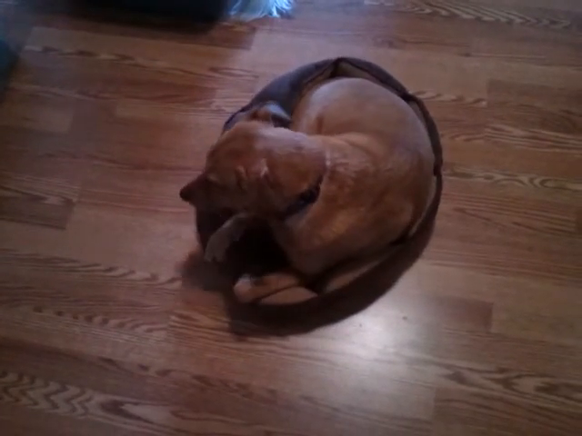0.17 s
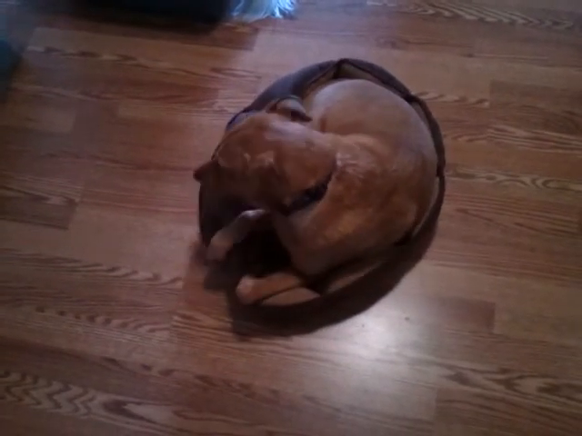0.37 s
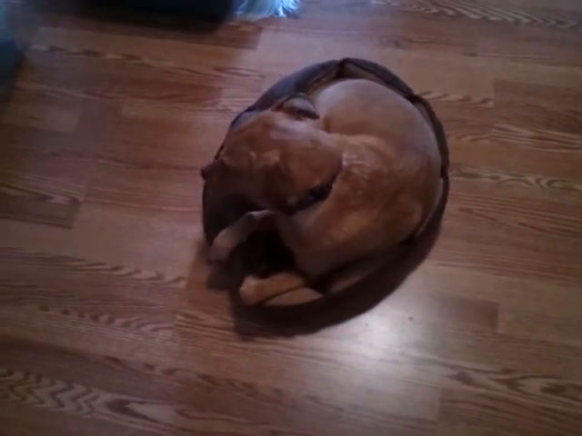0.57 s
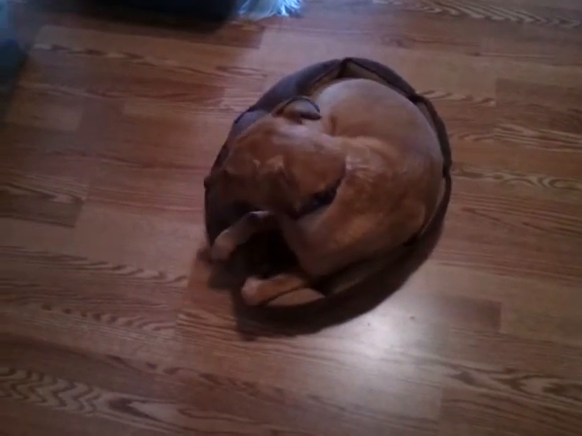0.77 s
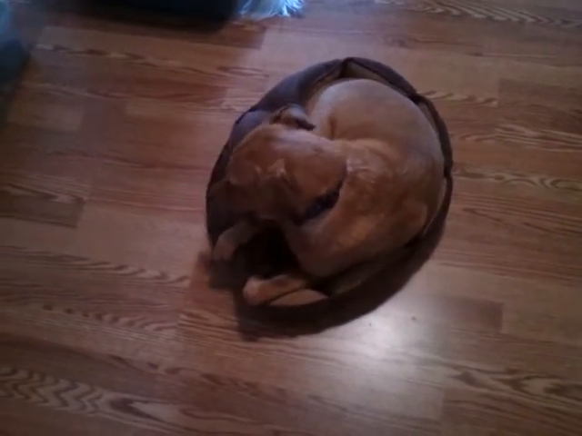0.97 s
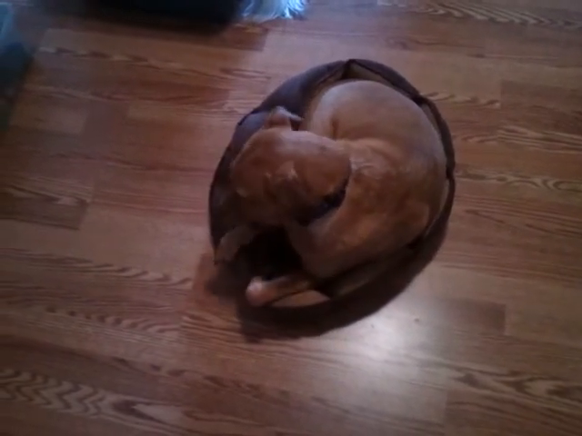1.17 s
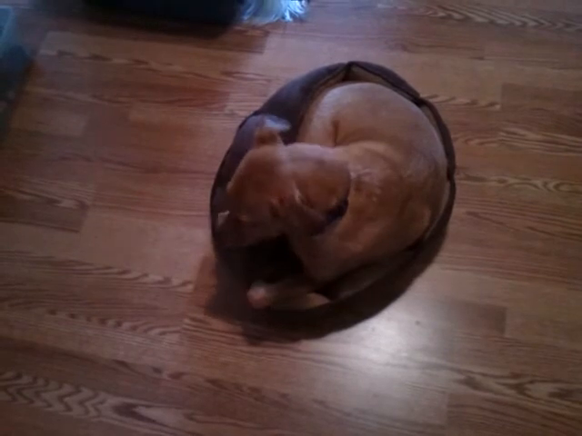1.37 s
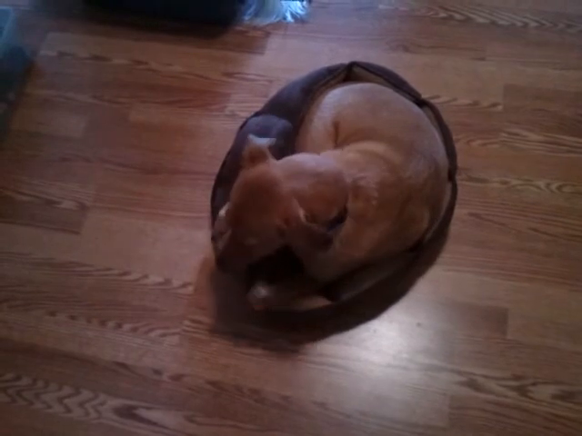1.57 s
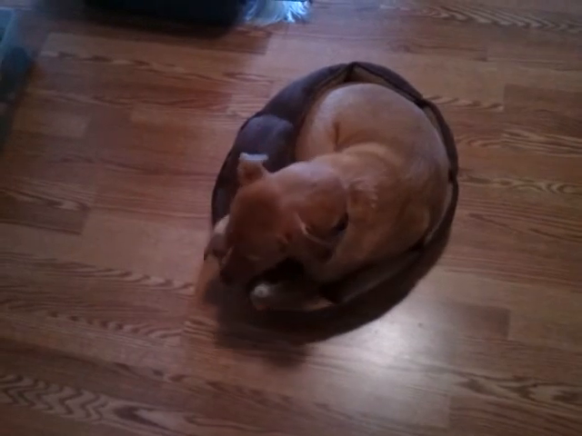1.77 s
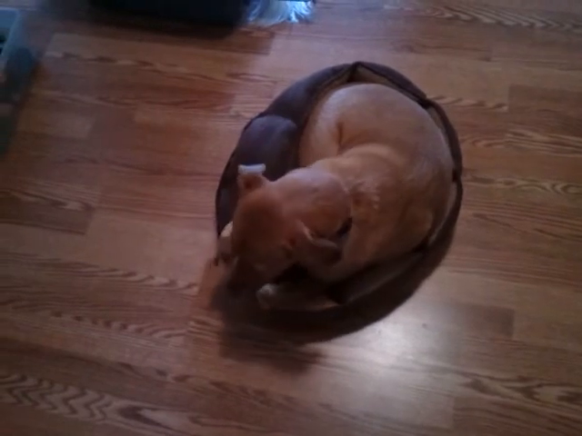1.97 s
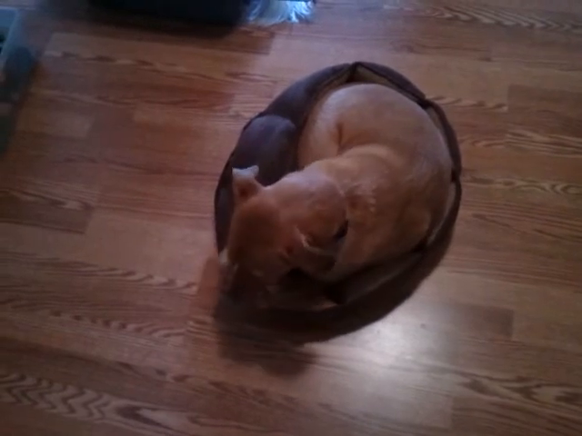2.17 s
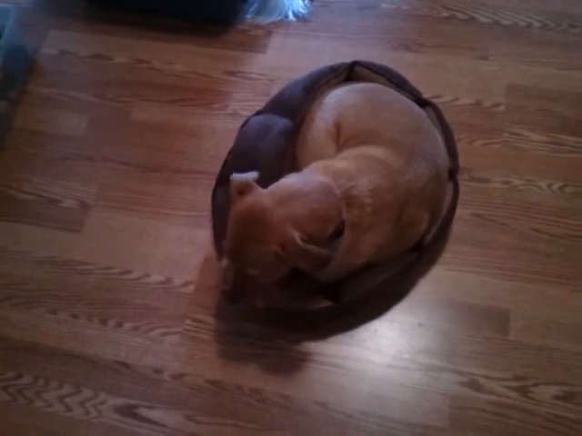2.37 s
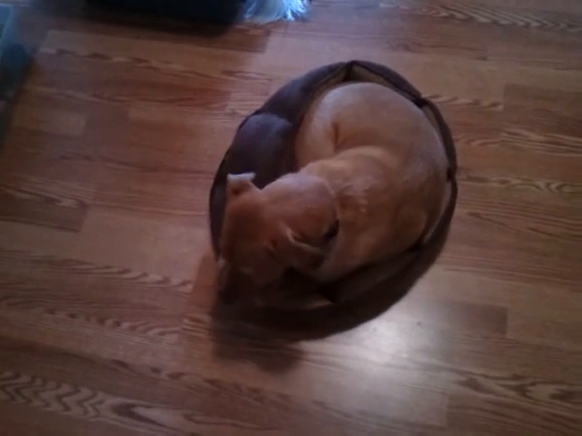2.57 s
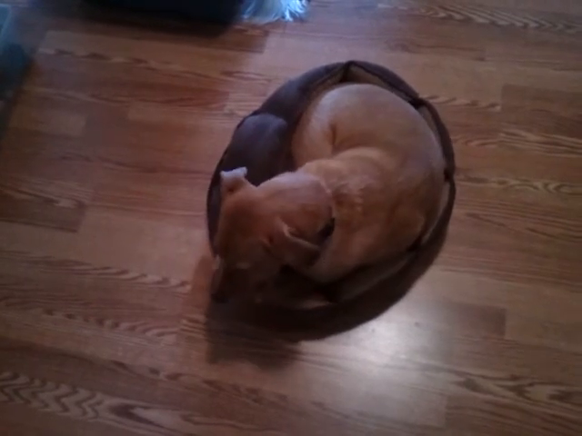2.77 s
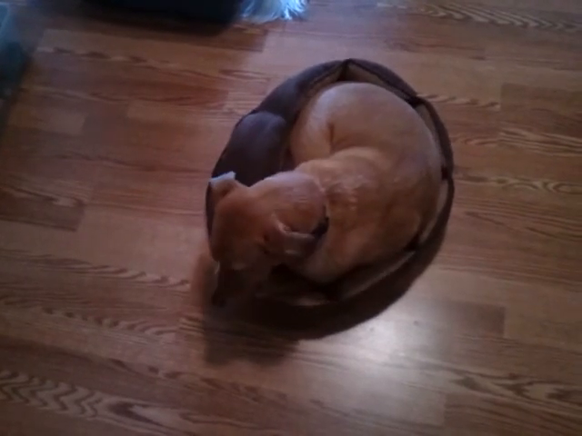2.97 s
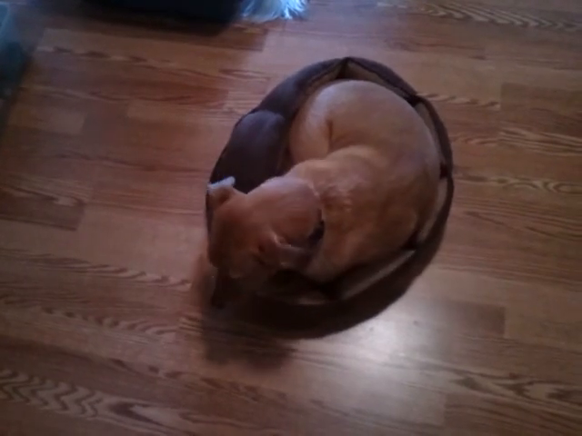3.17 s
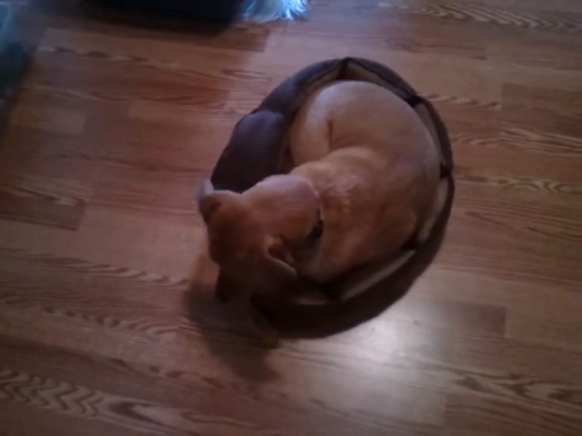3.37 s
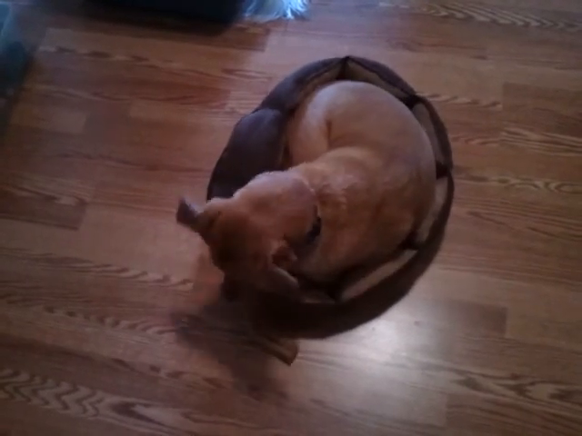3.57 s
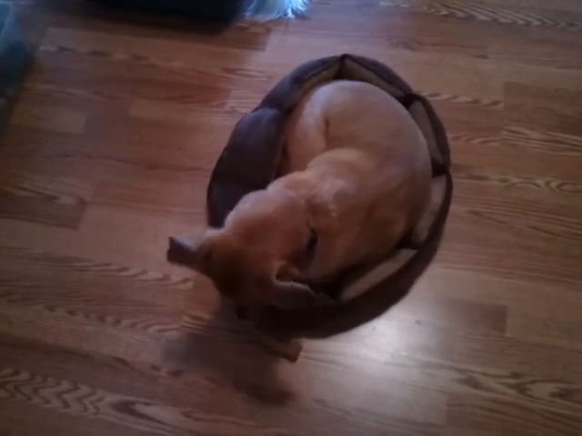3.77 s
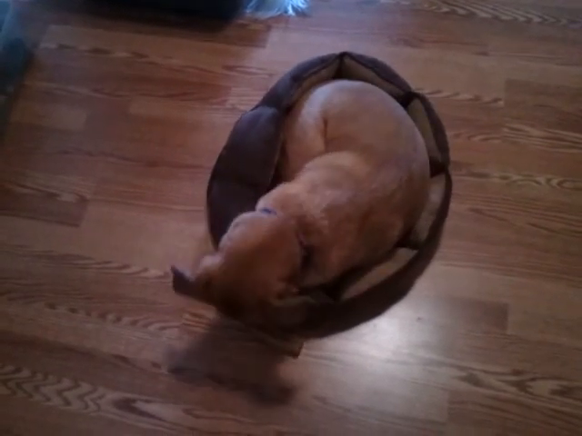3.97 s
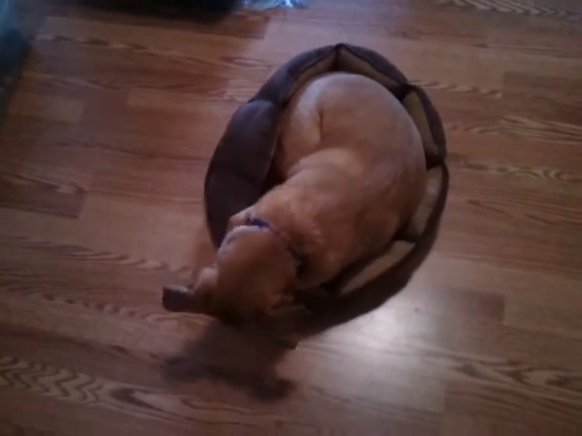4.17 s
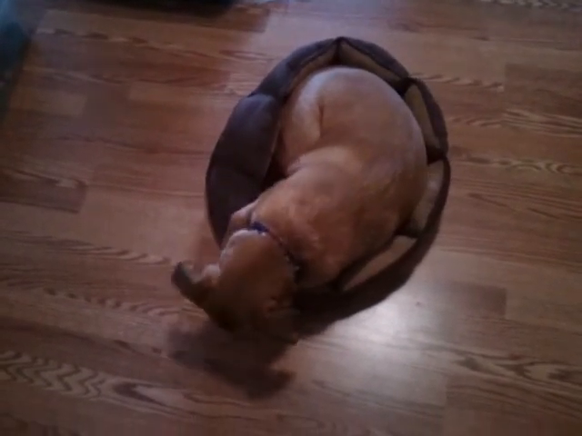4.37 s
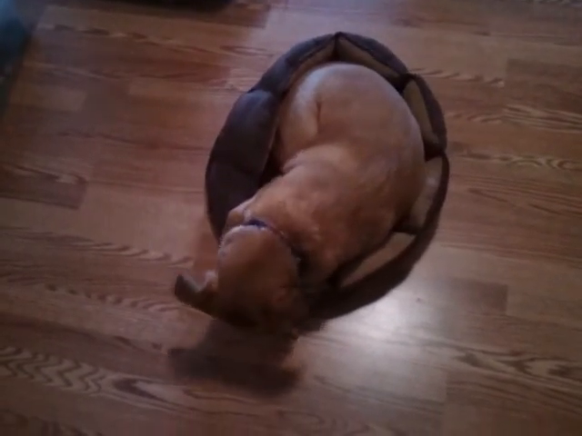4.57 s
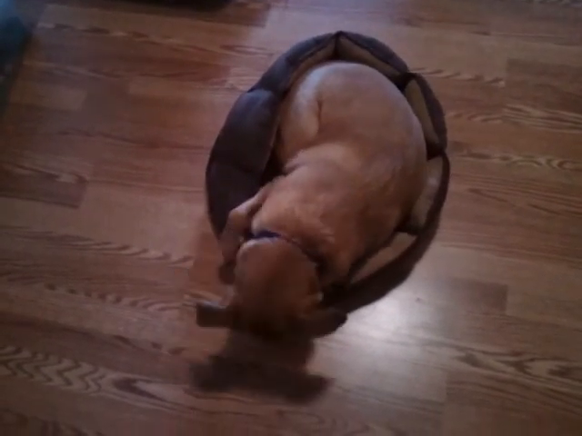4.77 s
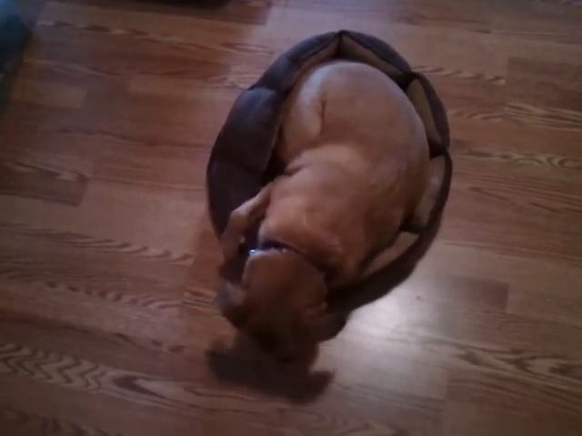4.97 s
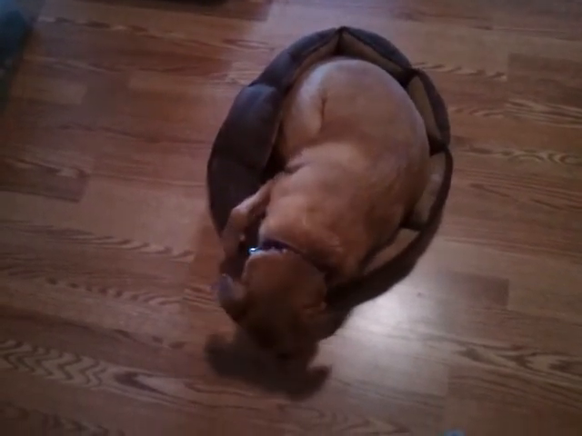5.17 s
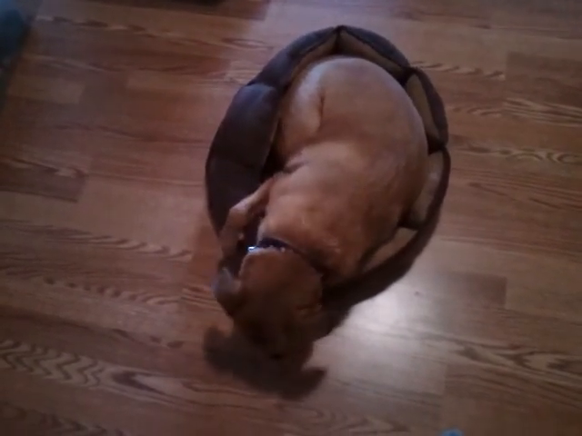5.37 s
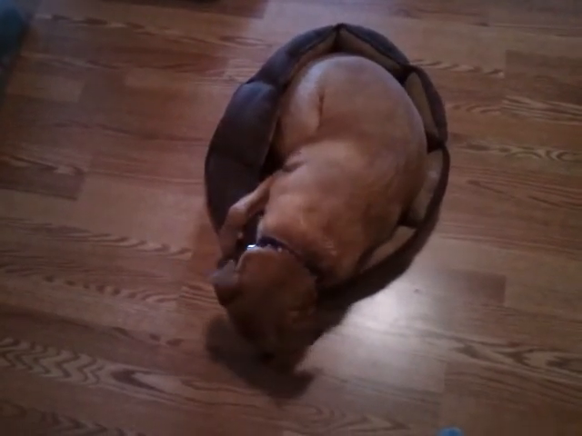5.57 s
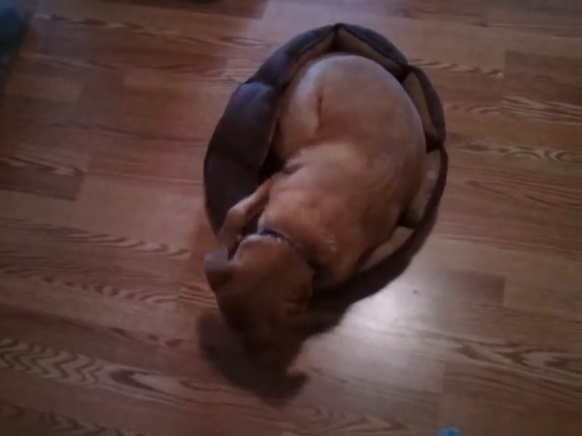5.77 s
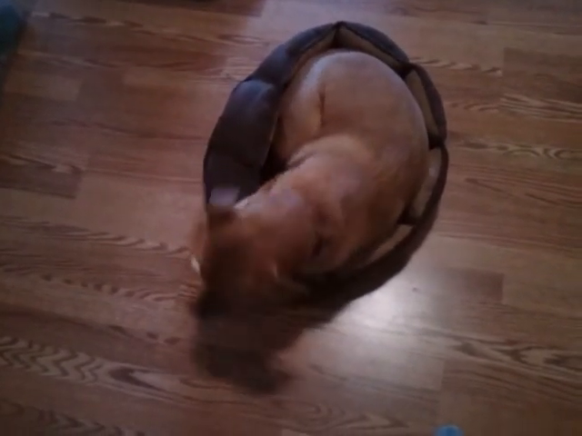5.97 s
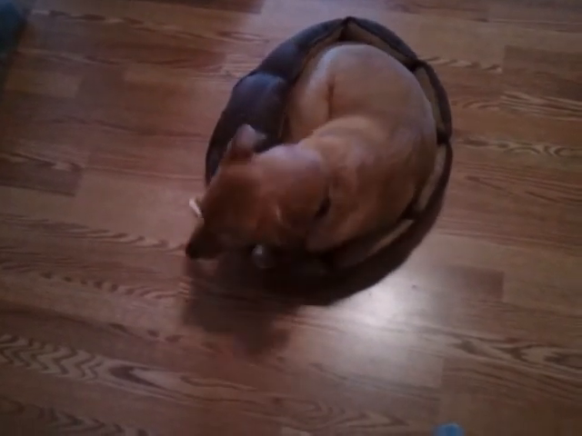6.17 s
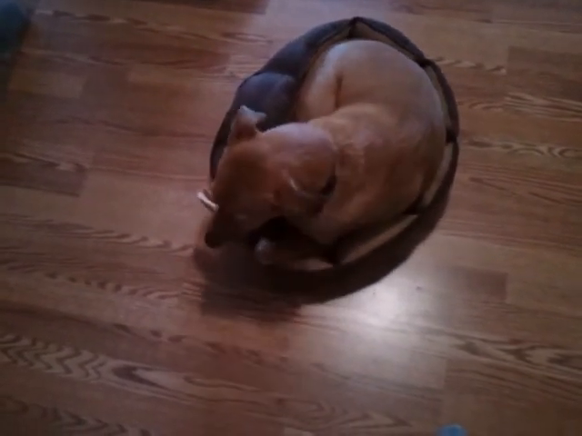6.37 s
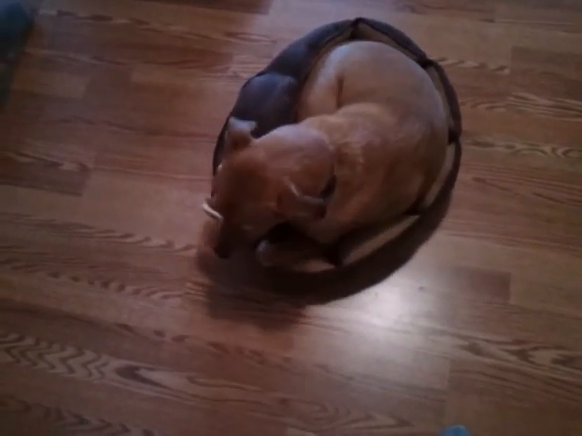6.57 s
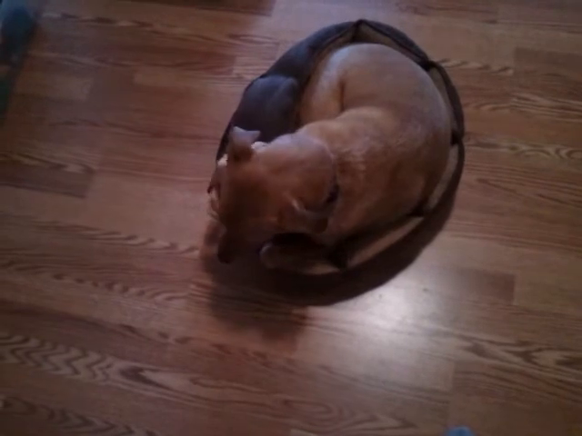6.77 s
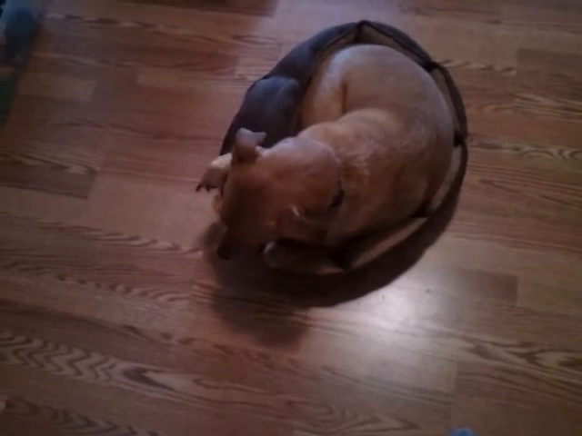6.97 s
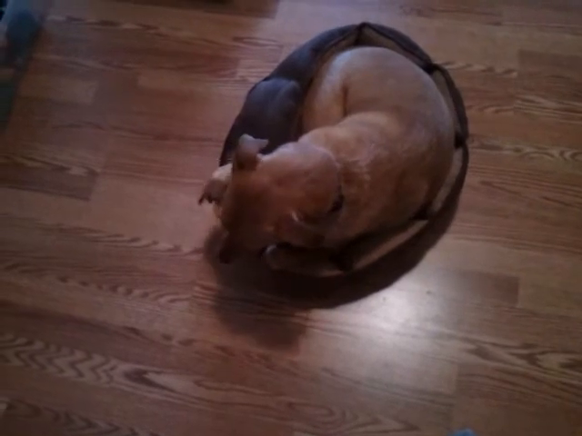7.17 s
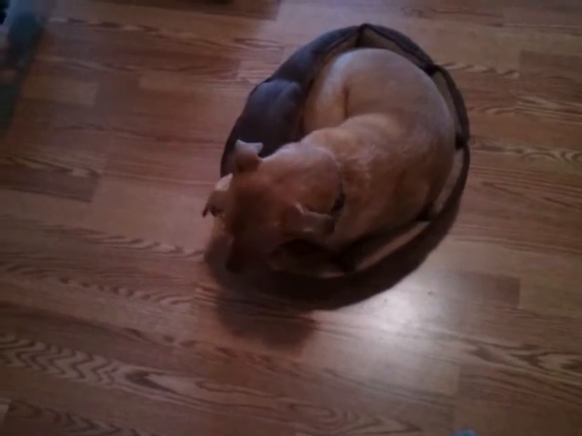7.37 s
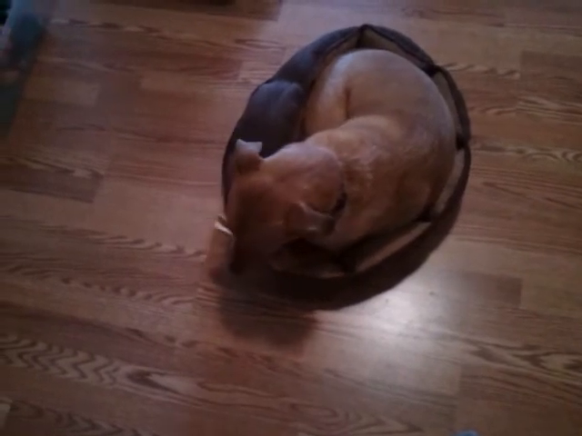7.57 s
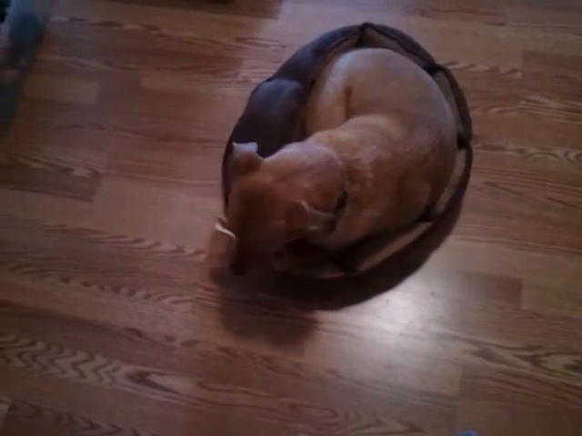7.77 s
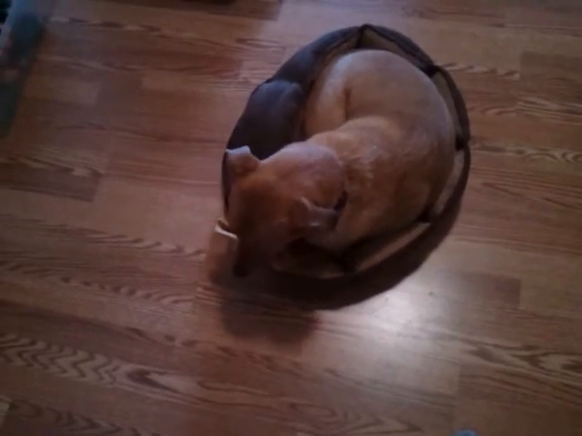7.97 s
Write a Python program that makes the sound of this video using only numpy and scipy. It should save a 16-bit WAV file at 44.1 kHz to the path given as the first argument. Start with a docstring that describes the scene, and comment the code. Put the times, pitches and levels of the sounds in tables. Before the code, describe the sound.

A dog bites a hard bone with one sharp, splintering crack, followed by small squeaks and clicks of teeth and a puff through the nose. The bone then drops onto a wooden floor and bounces in a loud, ringing clatter. A few lighter knocks and soft bumps follow, then quiet sniffs and ticks. The room is bare and lively, picked up by a small, hissy microphone.

```python
"""A hard bone treat falls, bounces and is knocked about on a wooden floor as a dog gnaws and fetches it.
Each blow makes the boards thud and the bone crack and ring. Teeth splinter the bone, squeak and click on it.
The dog sniffs, with soft, slow breaths in and sharp puffs out; its bed rustles and its weight bumps the floor.
The room is bare and lively; a small, hissy microphone overloads on the fall."""
import sys
import numpy as np
from scipy import signal
from scipy.fft import rfft, irfft
from scipy.io import wavfile
from scipy.ndimage import uniform_filter1d

SR = 44100
rng = np.random.default_rng(int(sys.argv[2]) if len(sys.argv) > 2 else 0)


def master(y):
    """Save y as 16-bit WAV."""
    cut = np.clip(np.atleast_2d(y).T, -1, 1)
    pcm = np.round(cut * 32767)  # scale
    wavfile.write(sys.argv[1], SR, pcm.astype(np.int16))


N = 354113

# Levels are relative. A fade is the time to fall by 60 dB, a decay the time to fall to about a third.
# how long the room rings: f/Hz, fade/s
ROOM_FADES = [(120, .7), (400, 0.57), (800, 0.46), (1500, 0.42), (3000, 0.46), (7000, 0.33)]
# echoes from nearby surfaces: delay/s, gain
ECHOES = [(.0042, 0.58), (.0056, 0.61), (.0083, 0.19), (.0172, .25), (0.027, 0.29)]
# tone of the room rumble and microphone hiss: f/Hz, level/dB
HISS_SPECTRUM = [(15, -36), (25, -3), (117, -4), (192, -4.5), (409, -9), (627, -12), (690, -12),
                 (776, -12.5), (2310, -18), (3290, -20), (6550, -18), (7200, -21.5), (9360, -50.5),
                 (15800, -120)]
# tone shared by the dog's breath and the bed's rustle: f/Hz, level/dB
RUSH_SPECTRUM = [(60, -14), (280, -8.5), (480, -1.5), (900, -0.5), (1250, -2.5), (1580, 1), (1850, -1),
                 (2250, 2.5), (3300, -4.5), (5000, -2.5), (7000, -2)]
# faint rustle of the bed as the dog moves: t/s, level/dB
RUSTLE_LEVELS = [(0, -91), (1.1, -73), (1.3, -61.5), (1.55, -76.5), (3.8, -72.5), (4, -66), (4.6, -72),
                 (5.25, -64.5), (6.1, -65.5), (8, -71.5)]
# breaths through the dog's nose: t/s, level/dB, decay/s, bass boost/dB, treble limit/Hz
SNIFFS = [(2.674, -34, 0.033, 10.5, 4000), (2.974, -47.5, 0.08, 0, 7100), (6.468, -50, 0.042, 2.5, 2600),
          (6.81, -59, 0.11, 3.5, 5000), (7.063, -37, 0.06, 0.5, 3700), (7.19, -45.5, 0.037, 6, 6000),
          (7.45, -51, 0.14, 7.5, 4870), (7.67, -37, 0.045, 3, 7100), (7.77, -49.5, 0.092, 17.5, 5000)]
# soft bumps as weight shifts: t/s, level/dB, f/Hz
BUMPS = [(2.675, -14, 365), (5.085, -25, 290), (5.442, -14, 176), (5.478, -16.5, 396),
         (5.799, -22.5, 32.75), (6.501, -29, 129), (7.03, -33, 48), (7.72, -19.5, 153), (7.98, -27.5, 153)]
# dry ticks near the microphone: t/s, level/dB
TICKS = [(1.154, -26), (7.3753, -21), (7.744, -13)]
# teeth touching the bone: t/s, level/dB, f/Hz
CLICKS = [(.9068, -16.5, 6500), (1.471, -34, 3600), (3.765, -37, 5626), (5.4458, -14.5, 6900),
          (7.322, -26.5, 2923), (7.327, -28.5, 6760)]
# teeth slipping on the bone: t/s, level/dB, f/Hz, overtone level/dB
SLIPS = [(.9016, 3.5, 970, -5.5), (1.225, -30.5, 921, -12), (1.328, -30, 2490, -20),
         (1.837, -26, 3400, 7.5), (2.097, -33.5, 2285, -15), (2.395, -25, 945, -22),
         (2.795, -21.5, 880, -25), (2.819, -15, 880, -24.5), (2.845, -22, 890, -25),
         (2.868, -18.5, 905, -20.5)]
# tone of a crack heard through the jaws: f/Hz, level/dB
JAW_SPECTRUM = [(100, -30), (240, -12), (340, -1.5), (540, 2.5), (700, 2), (1000, -4.5), (1420, 8.5),
                (1700, -8.5), (2200, 0), (3000, -10), (3900, -3), (4600, -15), (7000, -14)]
# the bone cracking between the teeth: t/s, level/dB, treble limit/Hz
BITES = [(0.894, -14, 2530), (0.902, -7.5, 4000), (0.9076, -12, 5050), (2.395, -31.5, 4000)]
# tone of the boards giving under a blow: f/Hz, level/dB
THUD_SPECTRUM = [(40, -40), (130, -20.5), (250, -22), (340, -10), (430, -10), (560, -6.5), (690, -2),
                 (930, 0), (1150, -8), (1600, -12.5), (7000, -26.5)]
# ringing notes of the floorboards: f/Hz, level/dB, fade/s
BOARD_NOTES = [(345, -10, .3), (511, -6, .2), (675, 0, .42), (728, -3, .3), (799, -1, .22), (913, 0, .22)]
# tone of the bone's crack: f/Hz, level/dB
CRACK_SPECTRUM = [(30, -32.5), (120, -19), (300, -11), (700, -11), (1300, -6), (2000, -1.5), (2800, -1),
                  (4000, -2.5), (5500, -3.5), (7000, -5.5)]
# ringing notes of the loose bone: f/Hz, level/dB, fade/s
BONE_NOTES = [(1288, -2, .1), (1444, 0, 0.11), (1596, -2.5, 0.073), (1715, -4, .1), (1970, -2, 0.054),
              (2151.2, -6, 0.17), (2400, -3.5, 0.13), (2715, 0.5, 0.06), (3020, -2, 0.11), (3240, -5, 0.11),
              (4130, -4.5, .06), (4470, 0.5, 0.13), (5500, 2.5, 0.027)]
# the bone hitting the boards: t/s, thud level/dB, crack level/dB, thud treble limit/Hz
KNOCKS = [(3.1947, 16, 13, 1500), (3.2713, 0, -13, 1510), (3.2827, 13.5, 19.5, 1700), (3.3802, 5, -5, 1295),
          (3.4605, 8.5, 2, 1618), (4.7658, -6.5, -15, 1703), (5.1416, -5, -19.5, 742),
          (5.1525, -11, -43, 776), (5.4441, -16.5, -22, 1100), (5.5428, 4, -9, 1400)]

TOP_HZ = 8300  # the microphone passes almost nothing above this


def amp(db):
    """Turns decibels into a gain to multiply by."""
    return 10 ** (np.asarray(db) / 20)


def unit(x):
    """Scales a sound to an energy of 1."""
    return x / np.sqrt(np.sum(x ** 2) + 1e-20)


def read(points, hz):
    """Reads between the rows of a table, on a log-frequency axis."""
    f, value = np.transpose(points)
    return np.interp(np.log(hz + 1), np.log(f + 1), value)


def add(mix, s, sound):
    """Mixes a sound in, starting at s seconds."""
    part = mix[max(round(s * SR), 0):][:len(sound)]
    part += sound[:len(part)]


def seconds(length):
    """The time of each sample."""
    return np.arange(int(length * SR)) / SR


def colour(x, gain):
    """Turns each frequency up or down by gain(hz)."""
    return irfft(rfft(x) * gain(np.fft.rfftfreq(len(x), 1 / SR)), len(x))


def soften(hz, corner_hz, order=4):
    """A gain that takes away the treble above its corner."""
    return 1 / np.sqrt(1 + (hz / corner_hz) ** order)


def snap(spectrum, treble_hz=np.inf, order=4, size=2048):
    """The shortest sudden click with this spectrum, dulled above treble_hz."""
    hz = abs(np.fft.fftfreq(size, 1 / SR))
    gain = amp(read(spectrum, hz)) * soften(hz, treble_hz, order)
    log_gain = np.log(np.maximum(gain, 1e-5))
    front_loaded = np.exp(np.conj(signal.hilbert(log_gain)))  # minimum phase: energy comes first
    return unit(np.fft.ifft(front_loaded).real)


def reverb(x, build_s=.0031, early_boost=.5, early_decay_s=.0076):
    """The room rings on: a freshly drawn blur of echoes, each pitch dying at its own speed."""
    t = seconds(1)
    hz, frame_s, bands = signal.stft(rng.standard_normal(len(t)), SR, nperseg=512, noverlap=384)
    bands = bands / np.sqrt(abs(bands) + 1e-12)  # evens out the noise
    fade = amp(-60 * frame_s / read(ROOM_FADES, hz)[:, None])
    tail = signal.istft(bands * fade, SR, noverlap=384)[1][:len(t)]
    swell = np.clip(t / build_s - 1, 0, 1) * (1 + early_boost * np.exp(-t / early_decay_s))
    return signal.oaconvolve(x, unit(tail * swell))[:N]


def reflect(x):
    """A sound plus its first distinct echoes."""
    out = x.copy()
    for delay, gain in ECHOES:
        add(out, delay, gain * x)
    return out


def hiss(level_db=-60.5):
    """Steady room rumble and microphone hiss."""
    noise = colour(rng.standard_normal(N), lambda hz: amp(read(HISS_SPECTRUM, hz)) * (hz < TOP_HZ))
    return amp(level_db) * noise / noise.std()


def rush(size, bass_db, treble_hz, grain_db=3, bass_hz=480):
    """A grainy, rushing noise, for both breath and rustle."""
    def gain(hz):
        db = read(RUSH_SPECTRUM, hz) + bass_db * soften(hz, bass_hz)
        return amp(db) * soften(hz, treble_hz) * (hz < TOP_HZ)

    noise = rng.standard_normal(size)
    grains = np.repeat(rng.standard_normal(size // 40 + 1), 40)[:size]  # a new level every 40 samples
    shaped = colour(noise * amp(grain_db * grains), gain)
    return shaped / shaped.std()


def sniffs_and_rustle(typical_rise_s=.009, typical_decay_s=.039, direct_db=-4, room_db=-1):
    """Air rushes through the nose in soft, slow breaths and sharp puffs, over the bed's faint rustle."""
    rustle_db = np.interp(np.arange(N) / SR, *np.transpose(RUSTLE_LEVELS))
    out = amp(rustle_db) * rush(N, bass_db=-4, treble_hz=6530)
    t = seconds(1)
    for s, db, decay, bass_db, treble_hz in SNIFFS:
        rise = typical_rise_s * (decay / typical_decay_s) ** 1.5  # slow breaths swell far more gently
        breath = np.minimum(t / rise, 1) * np.exp(-np.maximum(t - rise, 0) / decay)
        add(out, s, amp(db) * breath * rush(len(t), bass_db, treble_hz))
    return amp(direct_db) * out + amp(room_db) * reverb(out)


def push(hz, decay_cycles=.48):
    """The floor swings a few times and comes to rest where it began."""
    decay = decay_cycles / hz
    t = seconds(10 * decay)
    swing = -t * np.exp(-t / decay) * np.sin(2 * np.pi * hz * t)
    return unit(np.gradient(swing))


def weight_bumps(sag_lag_s=.0089, sag_ratio=.35, sag_db=-7, room_db=-3):
    """Padded weight pushes on the floor, which then sags with a slower swing."""
    out = np.zeros(N)
    for s, db, hz in BUMPS:
        add(out, s, amp(db) * push(hz))
        add(out, s + sag_lag_s, amp(db + sag_db) * push(hz * sag_ratio))
    return out + amp(room_db) * reverb(out)


def scratch(hz, sharpness, decay_s):
    """A tiny burst of friction that rings around one pitch."""
    t = seconds(.06)
    burst = rng.standard_normal(len(t)) * np.exp(-t / decay_s)
    return unit(signal.lfilter(*signal.iirpeak(hz, sharpness, SR), burst))


def close_ticks():
    """Dry ticks, too close to the microphone for the room to be heard."""
    out = np.zeros(N)
    for s, db in TICKS:
        add(out, s, amp(db) * scratch(hz=5900, sharpness=7.7, decay_s=.0013))
    return out


def tooth_clicks(decay_cycles=15, room_db=-.5):
    """Light touches of the teeth ring in the room; higher ones die sooner."""
    out = np.zeros(N)
    for s, db, hz in CLICKS:
        add(out, s, amp(db) * scratch(hz, sharpness=2.2, decay_s=decay_cycles / hz))
    return out + amp(room_db) * reverb(out)


def squeak(hz, length_s=.012, waver=.072, grit_db=-12):
    """A tooth sticks and slips: the bone squeaks at one of its notes and its surface crumbles."""
    t = seconds(length_s)
    grip = np.sin(np.pi * (t / length_s) ** .23)  # takes hold quickly, lets go slowly
    drift = uniform_filter1d(rng.standard_normal(len(t)), size=40)
    pitch_hz = hz * (1 + waver * drift / drift.std())
    tone = np.sin(2 * np.pi * np.cumsum(pitch_hz) / SR)
    grit = signal.oaconvolve(rng.standard_normal(len(t)) * grip, snap(CRACK_SPECTRUM))
    out = amp(grit_db) * unit(grit)
    add(out, 0, unit(grip * tone))
    return out


def tooth_slips(jump_s=.0044, jump_ratio=2.04, catch_s=.024, catch_db=-9.5, low_hz=300, room_db=-6):
    """Each slip squeaks, jumps to a higher note of the bone and catches once more."""
    out = np.zeros(N)
    for s, db, hz, overtone_db in SLIPS:
        add(out, s, amp(db) * squeak(hz))
        add(out, s + jump_s, amp(db + overtone_db) * squeak(hz * jump_ratio))
        add(out, s + catch_s, amp(db + catch_db) * squeak(hz))
    out = signal.lfilter(*signal.butter(2, low_hz, "high", fs=SR), out)  # small things give no deep bass
    return out + amp(room_db) * reverb(out)


def splinters(spread_s, count=12):
    """One sharp spike and a quick, dwindling run of random ones."""
    out = np.zeros(int(.1 * SR))
    out[0] = 2
    for lateness, size in zip(rng.random(count), rng.standard_normal(count)):
        add(out, lateness * spread_s, [size * np.exp(-2 * lateness)])
    return unit(out)


def bites():
    """A hard bite splinters the surface of the bone; the jaws colour the crack."""
    out = np.zeros(N)
    for s, db, treble_hz in BITES:
        crack = snap(JAW_SPECTRUM, treble_hz)
        add(out, s, amp(db) * signal.oaconvolve(crack, splinters(spread_s=.008)))
    return out + reverb(out)


def ring(notes, length_s):
    """A struck object sounds its own notes, each dying away."""
    t = seconds(length_s)
    return unit(sum(amp(db - 60 * t / fade) * np.sin(2 * np.pi * hz * t) for hz, db, fade in notes))


def rocking(start_s=5.083, gap_s=.022, thud_db=-23.5, growth_db=2, crack_db=-55, treble_hz=660):
    """The bone rocks in three dull, growing taps, given as rows like those of KNOCKS."""
    return [(start_s + k * gap_s, thud_db + k * growth_db, crack_db, treble_hz) for k in range(3)]


def bone_knocks(boards_db=-17, thud_room_db=-3, bone_db=-16, direct_db=-12, echo_db=-3, echo_s=.0034):
    """Each blow gives a thud from the boards and a crack from the bone, heard mostly as echoes."""
    out = np.zeros(N)
    boards, bone = ring(BOARD_NOTES, length_s=.8), ring(BONE_NOTES, length_s=.3)
    for s, thud_db, crack_db, thud_hz in KNOCKS + rocking():
        thud = amp(thud_db) * snap(THUD_SPECTRUM, thud_hz, order=8)
        add(out, s, reflect(thud))
        add(out, s, amp(boards_db) * signal.oaconvolve(thud, boards))
        add(out, s, amp(thud_room_db) * reverb(thud))  # rings on in the room, with a fresh random tail

        treble_hz = 3170 * 2 ** (max(crack_db, 0) / 34)  # above 0 dB, harder cracks are brighter
        crack = amp(crack_db) * snap(CRACK_SPECTRUM, treble_hz)
        ringing_crack = amp(bone_db) * signal.oaconvolve(crack, bone)
        add(ringing_crack, 0, crack)
        scattered_crack = signal.oaconvolve(crack, splinters(spread_s=.002))
        add(out, s, amp(direct_db) * ringing_crack)
        add(out, s + echo_s, amp(echo_db) * scattered_crack)
        add(out, s, reverb(ringing_crack))
    return out


def scene():
    """All the sounds meet at one microphone."""
    bone = bone_knocks() + bites() + tooth_slips() + tooth_clicks()
    return (bone + close_ticks() + sniffs_and_rustle() + weight_bumps() + hiss())[None]


def record(dry, ceiling=.85, treble_hz=7450, offset=-.0018):
    """A small microphone dulls the treble, sits slightly off zero and flattens the loudest peaks."""
    treble_cut = signal.firwin(161, treble_hz, fs=SR, window="blackman")
    top_cut = signal.firwin(511, TOP_HZ, fs=SR, window=("kaiser", 9))
    heard = signal.oaconvolve(dry, treble_cut[None], "same")
    clipped = np.clip(heard + offset, -ceiling, ceiling)
    return signal.oaconvolve(clipped, top_cut[None], "same")


dry = scene()
out = record(dry)
master(out)
```